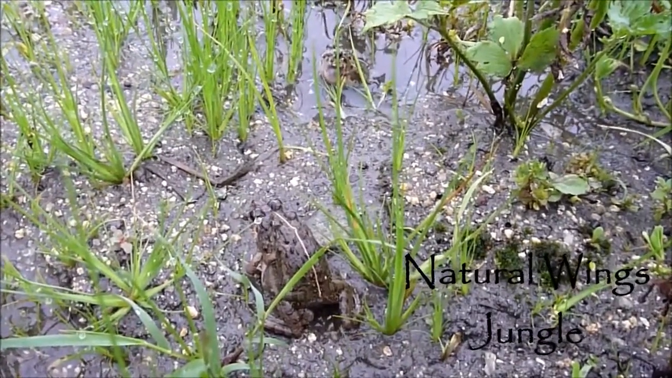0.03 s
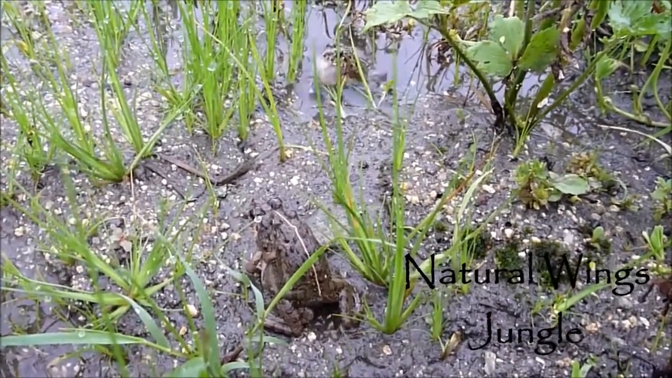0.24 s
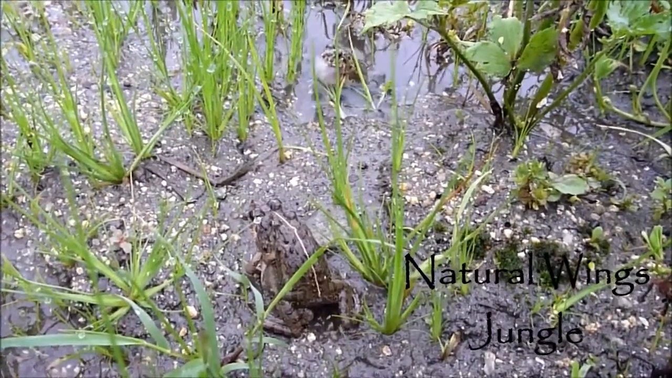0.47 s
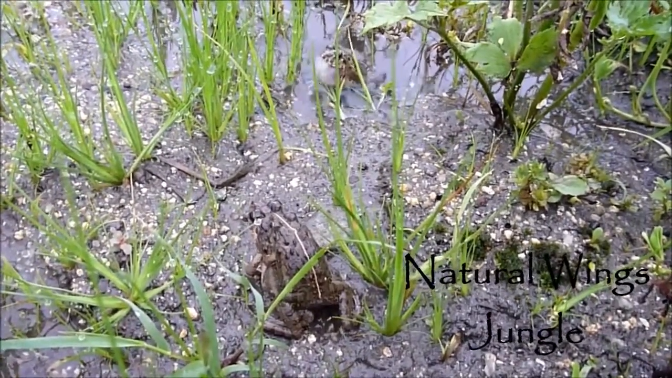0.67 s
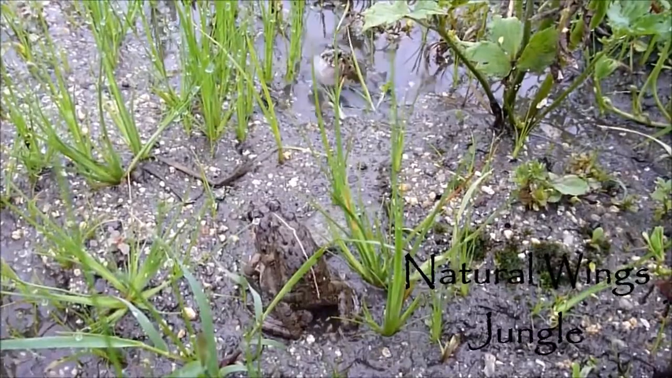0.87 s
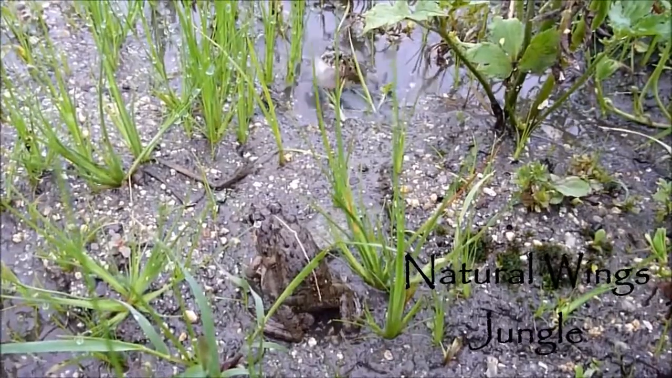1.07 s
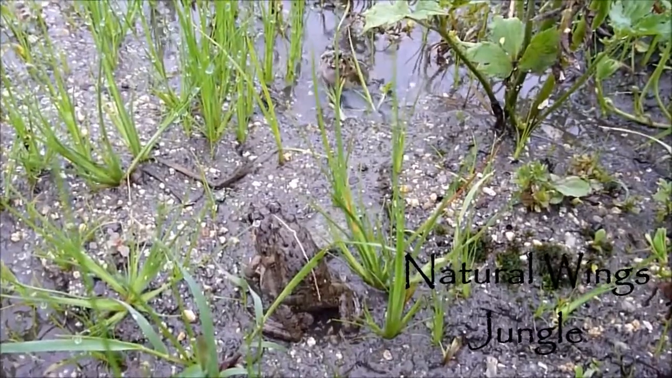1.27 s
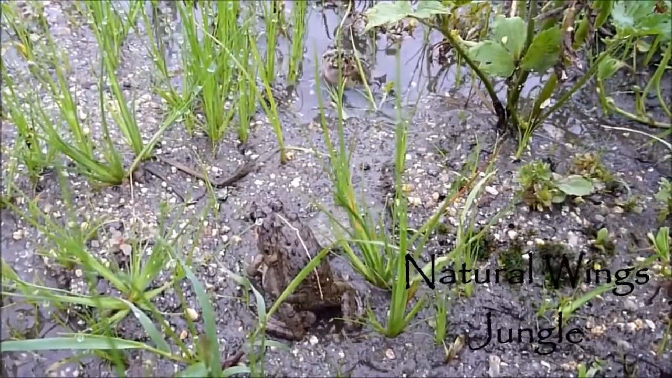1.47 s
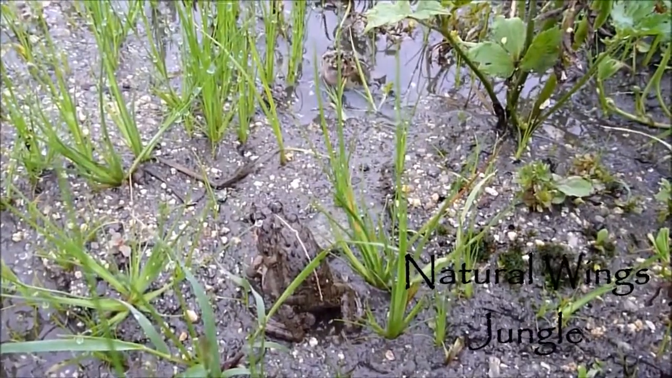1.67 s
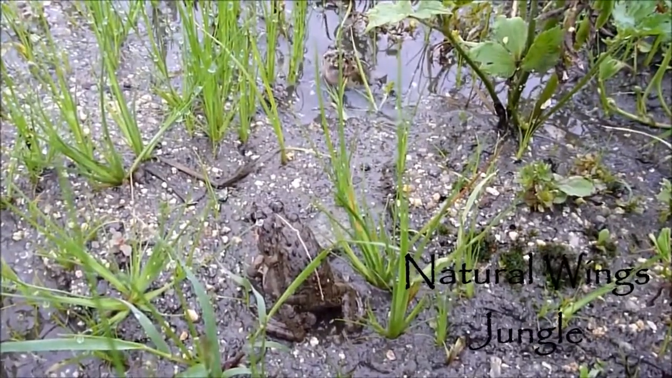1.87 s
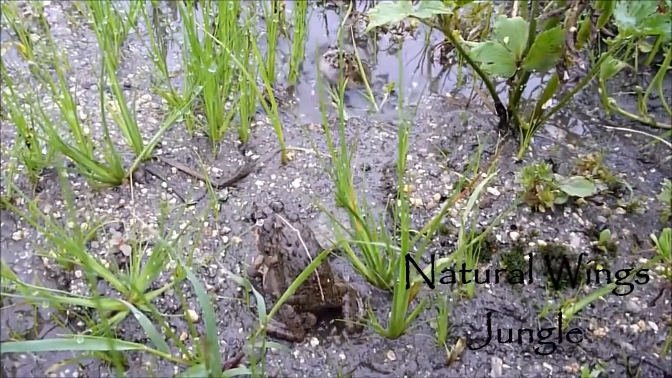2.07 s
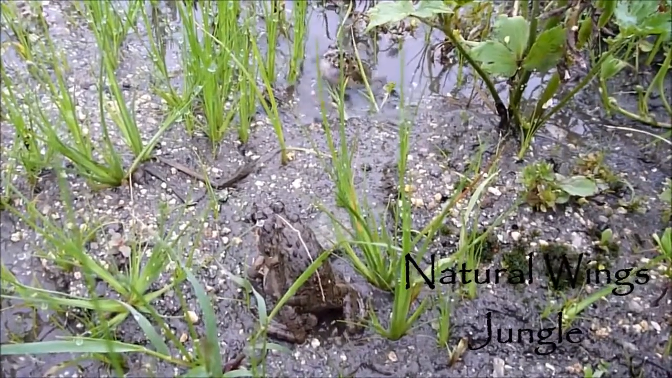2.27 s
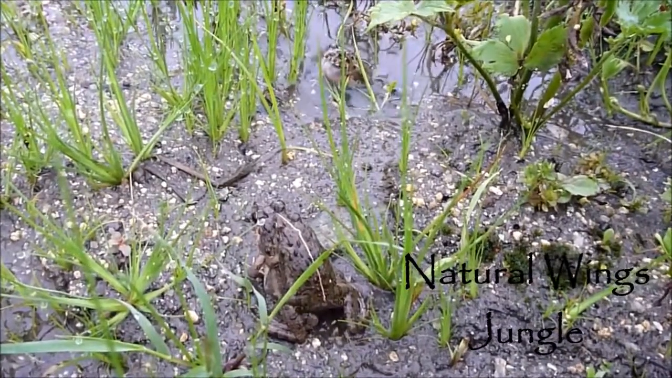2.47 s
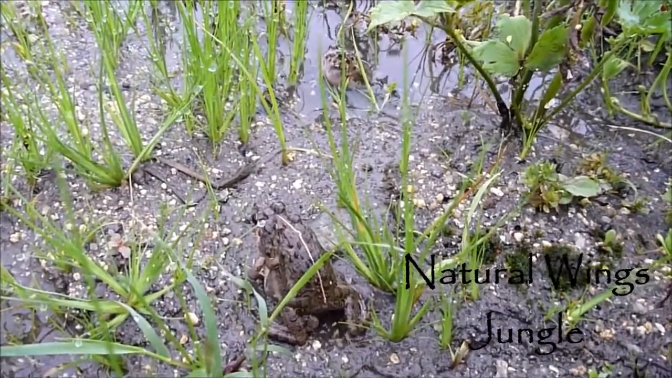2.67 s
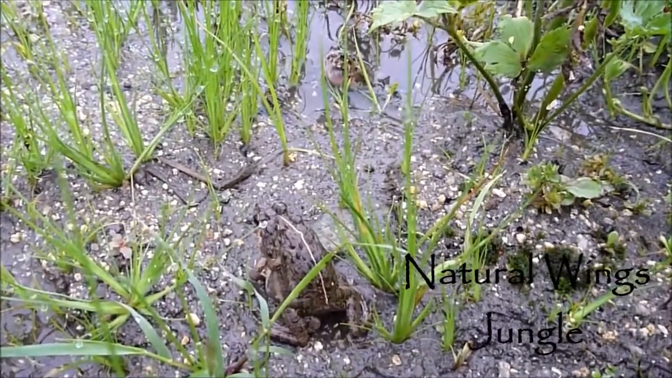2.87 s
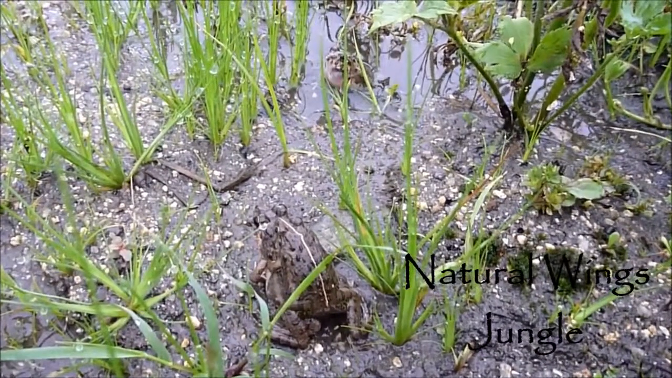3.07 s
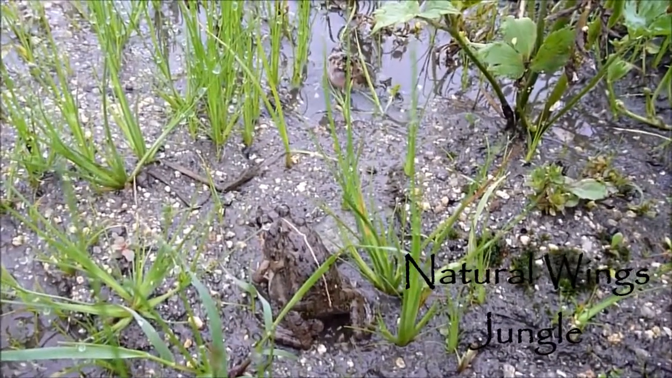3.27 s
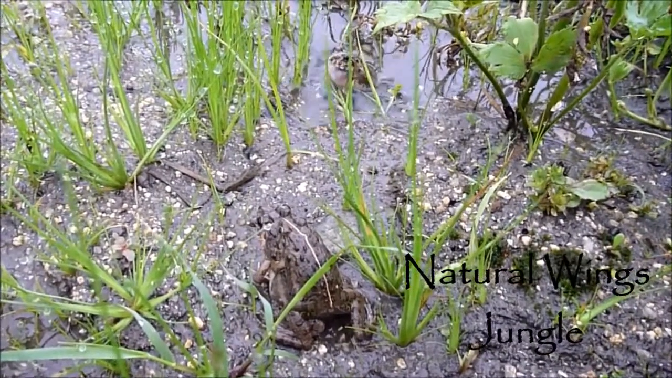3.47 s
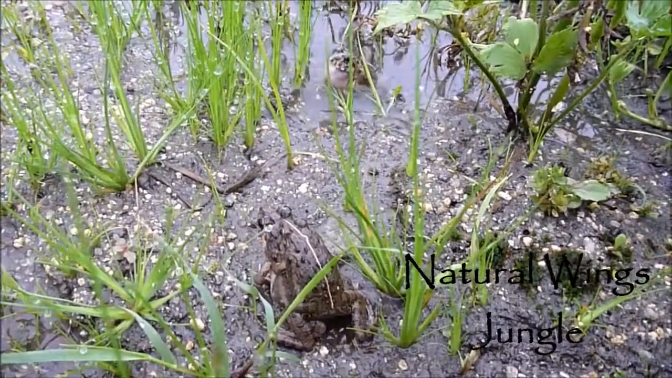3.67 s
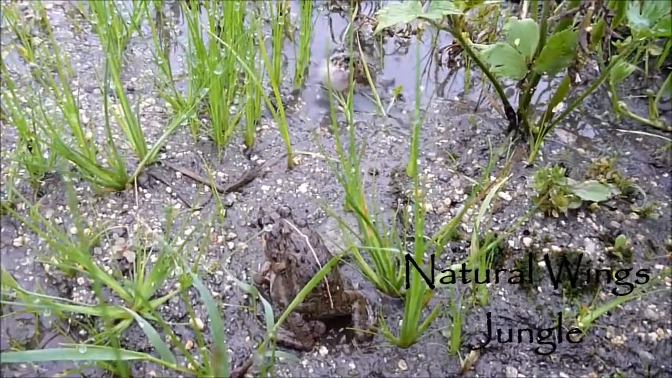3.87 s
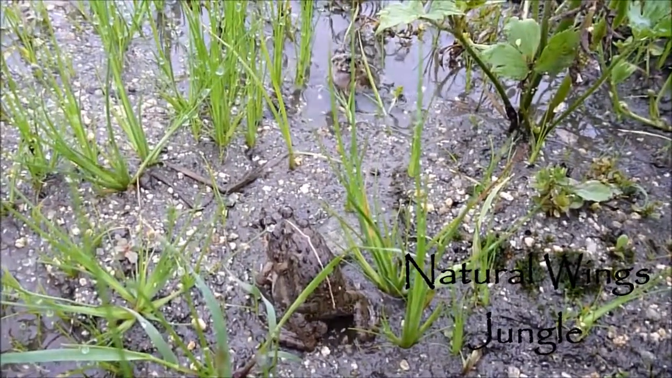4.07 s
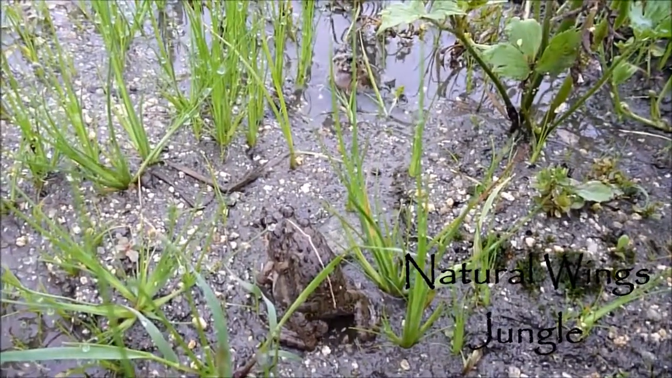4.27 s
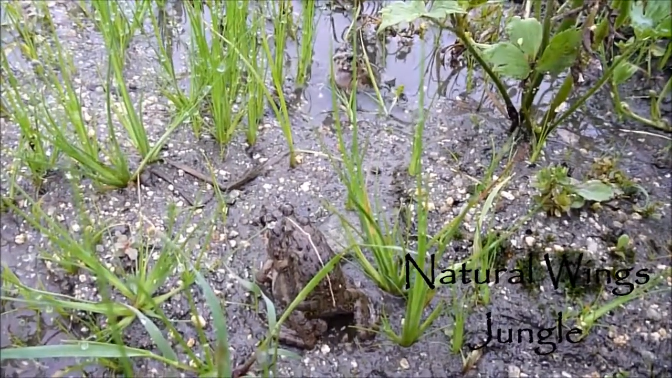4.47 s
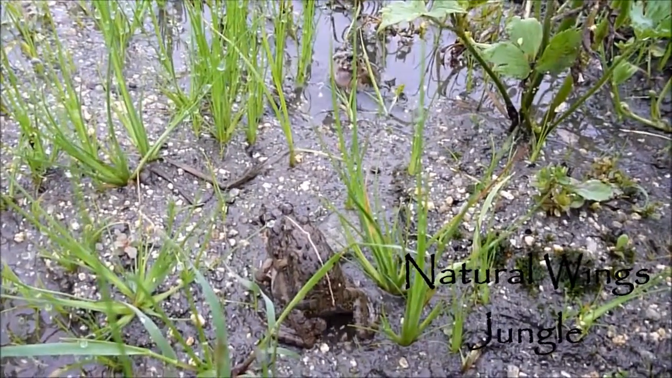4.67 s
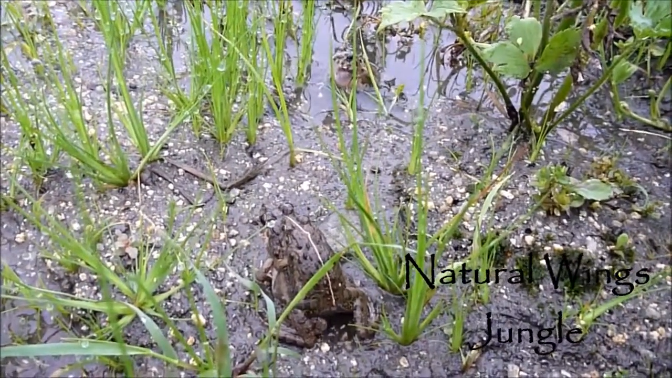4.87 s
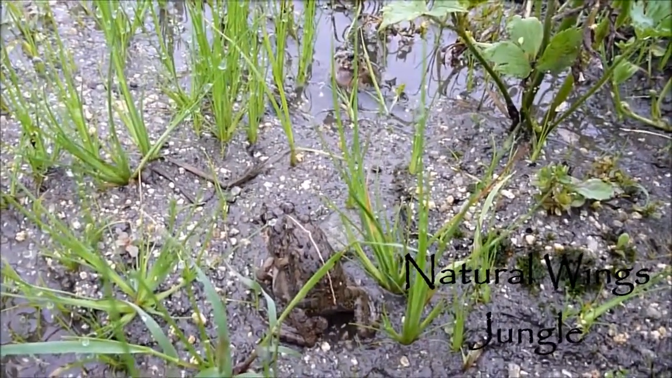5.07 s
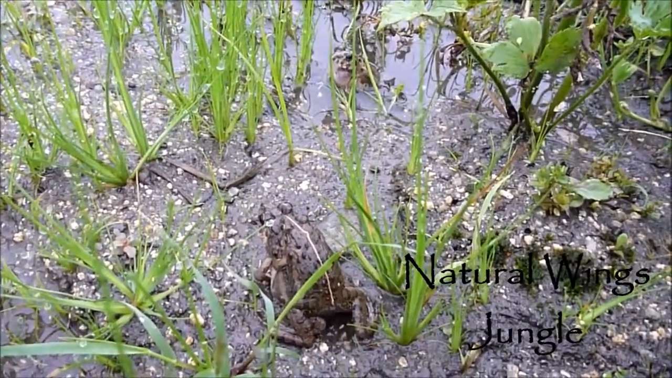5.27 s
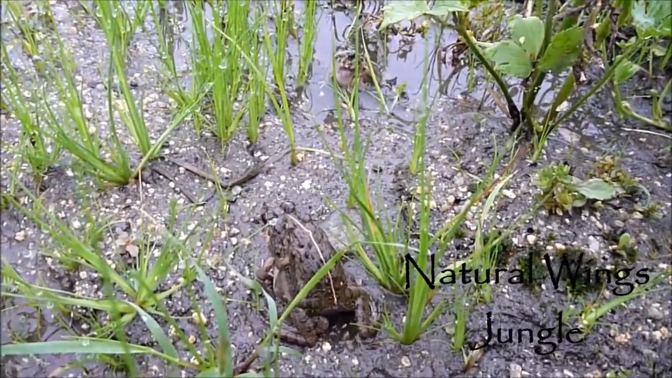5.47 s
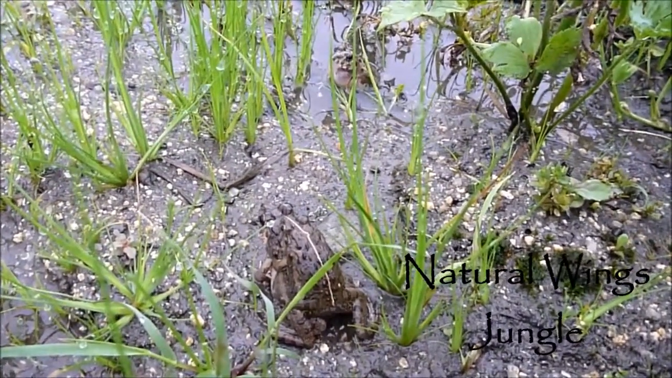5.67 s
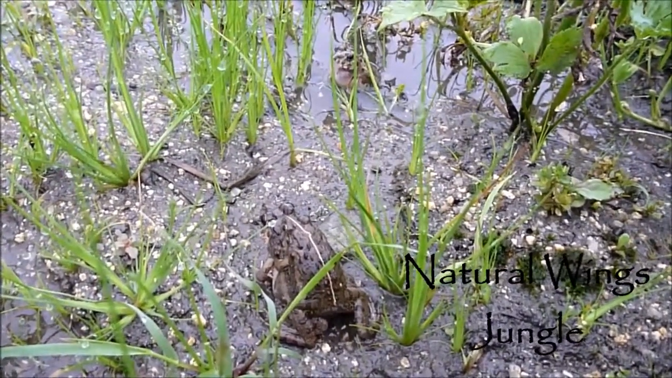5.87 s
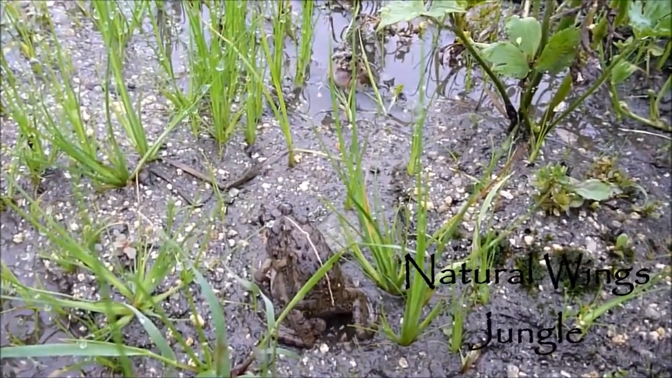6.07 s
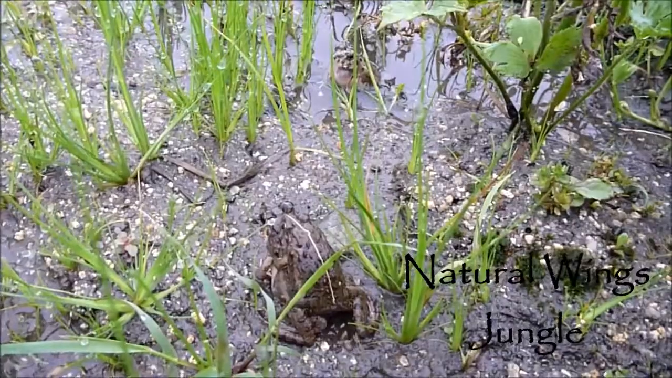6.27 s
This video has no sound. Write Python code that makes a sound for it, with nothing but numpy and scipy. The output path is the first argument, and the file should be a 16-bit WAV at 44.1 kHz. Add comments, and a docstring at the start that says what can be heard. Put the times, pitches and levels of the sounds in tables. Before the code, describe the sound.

Short, hard frog croaks come close by in three quick runs, with faint peeps and rattles from other frogs behind.

```python
"""In a flooded field, a frog close by gives three runs of short, hard croaks.
Each croak is a quickening train of air pulses; in each pulse the vocal cords sweep upwards and
drive the resonances of the vocal sac. Other frogs answer with faint peeps and rattles over the
hush of the field. A camera hums and hisses, its lens motor whirs, two tiny ticks sound,
and the camera's gain control ducks the hush at every croak."""
import sys
import numpy as np
from scipy import signal
from scipy.io import wavfile
from scipy.ndimage import uniform_filter1d

SR = 44100
rng = np.random.default_rng(int(sys.argv[2]) if len(sys.argv) > 2 else 0)


def wav_record(signal):
    """Record a signal, one row per channel, as 16-bit PCM in the file named by sys.argv[1]."""
    frames = np.transpose(np.atleast_2d(signal))
    bounded = np.clip(frames, -1, 1)
    # unit amplitude maps onto the largest positive 16-bit level
    quanta = np.round(bounded * 32767).astype(np.int16)
    wavfile.write(sys.argv[1], SR, quanta)


N = 279594


def gain_of(db):
    """The decibel scale: 20 dB is a factor of ten in amplitude."""
    return 10 ** (np.asarray(db) / 20)


def unit_rms(x):
    """Normalisation to a mean power of 1."""
    return x / np.sqrt(np.mean(x ** 2) + 1e-20)


def add(mix, start_s, sound):
    """Superposition: a sound sums into the mix from its start time on."""
    part = mix[max(round(start_s * SR), 0):][:len(sound)]
    part += sound[:len(part)]


def filtered(x, order, hz, kind="low"):
    """Maximally flat filtering: the skirts fall 6 dB an octave for each order."""
    return signal.sosfilt(signal.butter(order, hz, kind, fs=SR, output="sos"), x)


def wander(samples, hz):
    """Random modulation: low-passed noise of rms 1."""
    return unit_rms(filtered(rng.standard_normal(samples + 4000), 2, hz)[4000:])


def ring(x, modes):
    """Forced resonance: x drives damped modes in parallel."""
    return sum(gain_of(db) * signal.lfilter(*signal.iirpeak(hz, hz / width, SR), x)
               for hz, width, db in modes)


# Spectra of the field's hush and the camera's hiss. Each row: frequency in Hz, relative density in dB.
FIELD_HUSH = [(15, -64), (25, -33.5), (49, -9), (189, -4), (213, -1.5), (246, -8.5), (284, -4.5), (312, -5),
              (580, -8.5), (4600, -21.5), (7410, -29.5), (9630, -60.5), (16300, -120)]
CAMERA_HISS = [(7950, -19.5), (8600, -1.5), (10700, 1.5), (12100, -7.5), (13200, -8.5), (13800, -17.5),
               (16000, -29)]
def hush(spectrum, rms_db, patchy_db=1.29):
    """Spectral shaping: random noise follows a contour, its level drifting in time-frequency patches."""
    frames, hz = N // 256 + 5, np.fft.rfftfreq(1024, 1 / SR)
    real, imag, patches = rng.standard_normal((3, frames, len(hz)))
    patches = unit_rms(uniform_filter1d(uniform_filter1d(patches, size=14, axis=0), size=14, axis=1))
    knot_hz, knot_db = np.transpose(spectrum)
    contour_db = np.interp(np.log(hz + 1), np.log(knot_hz + 1), knot_db)
    bins = (real + 1j * imag) * gain_of(contour_db + patchy_db * patches)
    noise = signal.istft(bins.T, nperseg=1024, noverlap=768)[1][:N]
    return gain_of(rms_db) * unit_rms(noise)


# The camera's hum and thin whine. Each row: frequency in Hz, rms level in dB.
CAMERA_TONES = [(217, -66), (280, -69), (15625, -83)]
def hum(tones, waver_hz=.48):
    """Frequency modulation: each pure tone wavers slightly at random."""
    out = np.zeros(N)
    for hz, db in tones:
        cycles = np.cumsum(hz + waver_hz * wander(N, 11)) / SR
        out += gain_of(db) * np.sqrt(2) * np.sin(2 * np.pi * cycles)
    return out


# One air pulse. Each row: nominal time from the peak in seconds, relative drive in dB, nominal pitch in Hz.
PULSE_SHAPE = [(-.0075, -21, 1020), (-.0053, -14, 1100), (-.0033, -3, 1190), (-.002, -3, 1205),
               (-.0008, 2, 1440), (.0001, -.5, 1490), (.0011, -19, 1370), (.003, -28, 1380)]
# Harmonics of the cords, from the fundamental up. Each entry: relative level in dB.
CORD_HARMONICS = [3.5, -2.5, -11, -14.5, -18, -30, -35]
def air_pulse(stretch, tilt_db, pitch_ratio, sweep, hang_s=0, hang_db=-8, hang_hz=1285):
    """Flow-driven oscillation: the cords swell, sweep up and stop, or hang on and sag in a last puff."""
    times, drive_db, hz = np.transpose(PULSE_SHAPE)
    times = times * stretch
    hz = pitch_ratio * (hz[-1] + sweep * (hz - hz[-1]))
    if hang_s > 0:
        rise = times < 0
        times = np.append(times[rise], [hang_s / 4, hang_s])
        drive_db = np.append(drive_db[rise], [hang_db + 5, hang_db])
        hz = np.append(hz[rise], [hang_hz * 1.07, hang_hz])
    t = np.arange(times[0], times[-1], 1 / SR)
    unsteady = np.interp(t, [times[0], 0], [2, .5])  # the cords start unevenly and lock in at the peak
    hz = hz * (1.0127 + .011 * rng.standard_normal())  # no two puffs stretch the cords alike
    jitter = 1 + .034 * unsteady * wander(len(t), 900)
    cycles = np.cumsum(np.interp(t, times, hz) * jitter) / SR
    cords = sum(gain_of(db + k * tilt_db) * np.cos(2 * np.pi * ((k + 1) * cycles + rng.random()))
                for k, db in enumerate(CORD_HARMONICS))
    shimmer = 1 + .2 * unsteady * wander(len(t), 1000)
    breath = .18 * unsteady * wander(len(t), 3300)
    envelope = gain_of(np.interp(t, times, drive_db)) * signal.windows.tukey(len(t), .1)
    return t[0], envelope * (cords * shimmer + breath)


# Modes of throat and vocal sac. Each row: nominal frequency in Hz, bandwidth in Hz, gain in dB.
SAC_MODES = [(1266.9, 380, -13.5), (2764.4, 214.8, 4.5), (3365, 370, -1.5), (5185, 700, -15),
             (6798, 270, -8.5)]
def croak(start, length, pulses, gap, since_last, haste=.00255, empty_db=16.5, empty_s=.0095):
    """Source and filter: pulses ring the sac, ever faster, weaker, duller and lower as air runs out."""
    voice, lead_s = np.zeros(SR // 4), .02
    hurry = np.interp(since_last, [.21, .25], [1, 0])  # 1 for a hurried frog, 0 for a rested one
    droop = .082 * (1 - hurry) + .045 * hurry
    for k in range(pulses):
        at = gap * (k - haste * k ** 3)
        spent, left_s = min(at / length, 1), max(length - at, .001)
        late = spent ** 8
        tension = (1 + .018 * hurry) * (1 - droop * late)  # tunes both cords and sac
        level_db = -8 - empty_db * np.exp(-left_s / empty_s)  # the drive collapses as the lungs empty
        if k == 0:  # the opening pulse is short and bright, and weaker when hurried
            onset, puff = air_pulse(stretch=.82, tilt_db=1.5, pitch_ratio=.949 * tension, sweep=.6)
            level_db -= 3 + 2 * hurry
        else:
            onset, puff = air_pulse(stretch=1.03 - .24 * late, tilt_db=.58 - 3.8 * spent,
                                    pitch_ratio=1.002 * tension, sweep=1.02 - .54 * late,
                                    hang_s=left_s if k == pulses - 1 else 0)
        ringing = ring(np.pad(puff, (0, SR // 80)), np.array(SAC_MODES) * [tension, 1, 1])
        add(voice, lead_s + at + onset, gain_of(level_db + .082 * rng.standard_normal()) * ringing)
    t = np.arange(len(voice)) / SR - lead_s
    damping = np.clip((length + .00085 - t) / .0059, 0, 1)  # the slack sac stops ringing
    return start - lead_s, voice * damping


# The near frog's croaks. Each row: start in seconds, length in seconds, pulse count, first gap in seconds.
CROAK_CALLS = [(0.2818, 0.06827, 7, 0.01219), (0.5315, 0.08126, 8, 0.01281), (0.7317, 0.0851, 8, .013),
               (0.9221, 0.08127, 7, .01275), (1.1071, 0.08368, 8, 0.01215), (1.9756, 0.07193, 7, 0.01209),
               (2.189, 0.08983, 8, 0.01298), (2.3859, 0.0808, 7, .01285), (3.3797, 0.08316, 8, 0.01242),
               (3.6285, 0.0782, 7, 0.01315), (3.9183, 0.07484, 7, 0.01299)]
# Thin fizz of air on each pulse. Each row: frequency in Hz, bandwidth in Hz, gain in dB.
AIR_FIZZ = [(10400, 1400, -15)]
def near_frog(gain_db=7, low_hz=900, top_hz=7400):
    """Radiation from a small source: the sac gives no bass; its overtones die out under a thin fizz."""
    voice, previous = np.zeros(N), -np.inf
    for start, length, pulses, gap in CROAK_CALLS:
        add(voice, *croak(start, length, round(pulses), gap, since_last=start - previous))
        previous = start
    voice = filtered(voice, 3, low_hz, "high")
    fizz = ring(filtered(voice, 4, 9000, "high"), AIR_FIZZ)
    return gain_of(gain_db) * (filtered(voice, 8, top_hz) + fizz)


# A second frog's soft peeps. Each row: start in seconds, relative level in dB.
PEEP_CALLS = [(.429, -49), (1.584, -51), (2.141, -45.5), (2.59, -49.5), (3.279, -46), (3.854, -45.5),
              (4.513, -46), (6.047, -44.5)]
def peeping_frog(length_s=.042, gain_db=5.5, upper_db=-13):
    """Gliding sinusoids: a nearly pure falling note, closed by a short higher one."""
    out, progress = np.zeros(N), np.linspace(0, 1, round(length_s * SR))
    note_hz, upper_hz = np.linspace(1276.3, 1244.9, len(progress)), np.linspace(2592, 2280, len(progress))
    swell = np.interp(progress, [0, .27, .48, .75, 1], [.05, .938, .44, .25, .1])
    note = swell * np.sin(2 * np.pi * np.cumsum(note_hz) / SR)
    upper = np.exp(-((progress - .8) / .11) ** 2) * np.sin(2 * np.pi * np.cumsum(upper_hz) / SR)
    for start, db in PEEP_CALLS:
        add(out, start, gain_of(db + gain_db) * (note + gain_of(upper_db) * upper))
    return out


# A farther frog's rattles. Each row: start in seconds, length in seconds.
RATTLE_CALLS = [(0.441, 0.0655), (0.703, 0.059), (2.115, 0.073), (3.504, 0.06), (3.785, 0.0973),
                (4.068, 0.0983)]
# Modes of its throat. Each row: frequency in Hz, bandwidth in Hz, gain in dB.
THROAT_MODES = [(1488, 190, 1), (3083, 370, -3), (3760, 450, -12), (5591, 900, -14)]
def rattling_frog(level_db=-44.5, fade_db=10, puffs_per_s=85):
    """Amplitude-modulated noise: rough puffs excite the throat's modes, fading along each call."""
    out = np.zeros(N)
    for start, length in RATTLE_CALLS:
        t = np.arange(0, length, 1 / SR)
        puffs = (.1736 + np.exp(-(t * puffs_per_s % 1) / .16)) * rng.standard_normal(len(t))
        voice = unit_rms(ring(filtered(puffs, 2, [1250, 3600], "band"), THROAT_MODES))
        envelope = gain_of(level_db - fade_db * t / length) * signal.windows.tukey(len(t), .15)
        add(out, start, voice * envelope)
    return out


# Runs of the lens motor. Each row: start in seconds, end in seconds.
MOTOR_RUNS = [(.71, 1.105), (3.249, 3.25), (5.251, 5.672)]
# Modes of the lens barrel. Each row: frequency in Hz, bandwidth in Hz, gain in dB.
BARREL_MODES = [(9330, 80, -5.5), (10200, 120, 0.5), (10552, 600, -6), (12947, 300, -7.5)]
def lens_motor(level_db=-69.5, step_hz=179.42, roughness=.4):
    """Forced vibration: high harmonics of the motor's even, slightly rough steps ring the barrel."""
    out = np.zeros(N)
    for start, end in MOTOR_RUNS:
        t = np.arange(0, end - start, 1 / SR)
        steps = sum(np.cos(2 * np.pi * (k * step_hz * t + rng.random())) for k in range(48, 78))
        drive = unit_rms(steps) + roughness * rng.standard_normal(len(t))
        whir = unit_rms(ring(drive, BARREL_MODES))
        add(out, start, gain_of(level_db) * whir * signal.windows.tukey(len(t), .08))
    return out


# Tiny ticks. Each row: start in seconds, peak level in dB, centre frequency in Hz, bandwidth in Hz.
TINY_TICKS = [(.729, -42, 14080, 4000), (4.745, -47.5, 4350, 707.1)]
def ticks(decay_s=.002):
    """Transient excitation: a decaying burst of noise passes twice through one resonance."""
    out, t = np.zeros(N), np.arange(SR // 40) / SR
    for start, db, hz, width in TINY_TICKS:
        burst = rng.standard_normal(len(t)) * np.exp(-t / decay_s)
        mode = [(hz, width, 0)]
        tick = ring(ring(burst, mode), mode)
        add(out, start, gain_of(db) * tick / abs(tick).max())
    return out


def open_ground(x, scatter_db=-24, scatter_t60_s=.065, tail_db=-39, tail_t60_s=.26):
    """Diffuse reflection: mud and grass return a brief scatter and a very faint tail."""
    t = np.arange(SR // 2) / SR
    response = np.zeros(len(t))
    for db, t60 in (scatter_db, scatter_t60_s), (tail_db, tail_t60_s):
        echoes = rng.standard_normal(len(t)) * gain_of(-60 * t / t60) * (t > .001)
        response += gain_of(db) * echoes / np.linalg.norm(echoes)
    return x + signal.fftconvolve(x, response)[:N]


def scene():
    """Superposition: three frogs, the ticks, the hush of the field and the camera's own noises."""
    frogs = open_ground(near_frog() + rattling_frog() + peeping_frog())
    camera = hush(CAMERA_HISS, rms_db=-74.5) + hum(CAMERA_TONES) + lens_motor()
    return (frogs + ticks() + hush(FIELD_HUSH, rms_db=-54.5) + camera)[None]


# Electrical hum after the gain control. Each row: frequency in Hz, rms level in dB before the bass cut.
CIRCUIT_TONES = [(62, -70.5)]
def record(dry, threshold_db=-11.5, slope=.8605, recovery_db_per_s=3.5, low_hz=55, top_hz=15800):
    """Automatic gain control: the gain drops at once and recovers slowly; then hum and band limits."""
    power_db = 10 * np.log10(abs(uniform_filter1d(dry[0] ** 2, size=130)) + 1e-12)
    release_db = recovery_db_per_s * np.arange(N) / SR
    opening_db = threshold_db + 3  # it starts a little ducked
    held_db = np.maximum.accumulate(np.maximum(power_db + release_db, opening_db)) - release_db
    duck_db = slope * uniform_filter1d(np.maximum(held_db - threshold_db, 0), size=130)
    ducked = filtered(dry / gain_of(duck_db) + hum(CIRCUIT_TONES), 1, low_hz, "high")
    treble_cut = signal.firwin(511, top_hz, window=("kaiser", 9), fs=SR)
    return signal.oaconvolve(ducked, treble_cut[None], "same")


dry = scene()
out = record(dry)
wav_record(out)
```